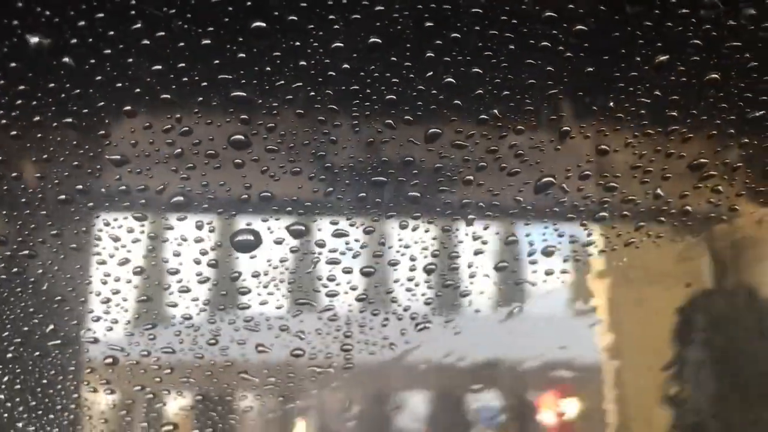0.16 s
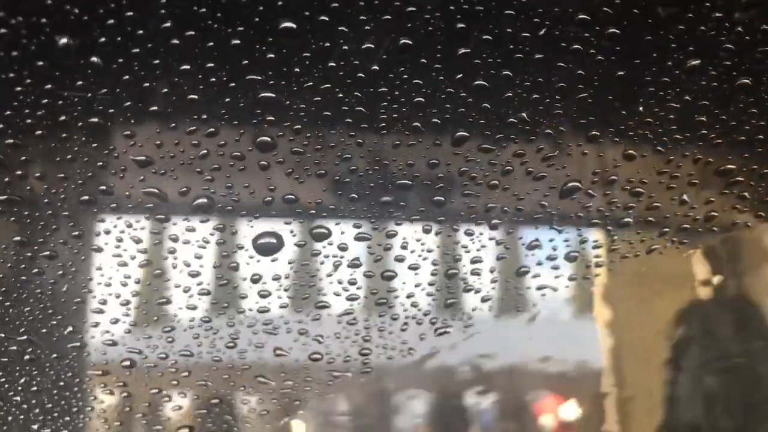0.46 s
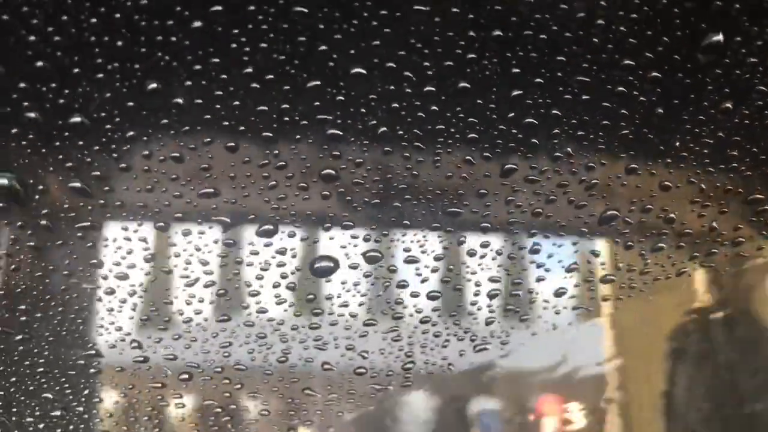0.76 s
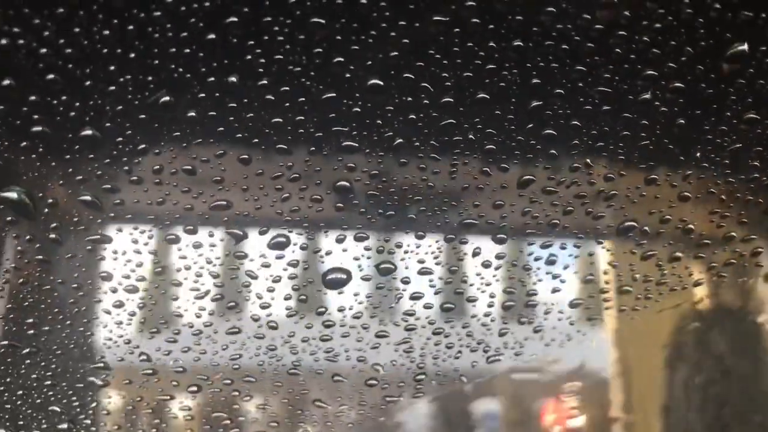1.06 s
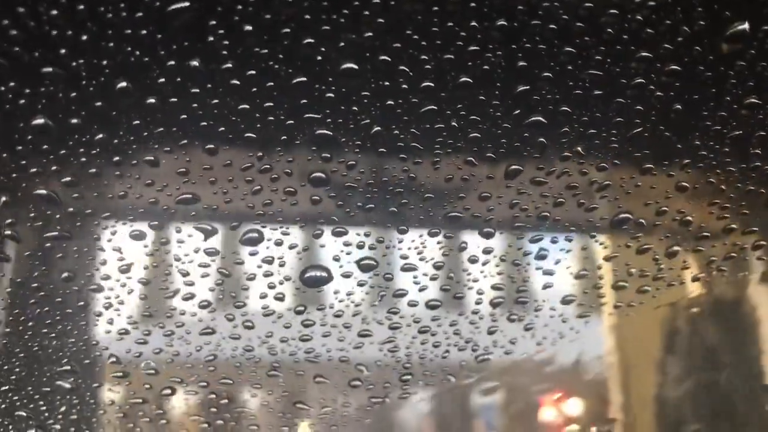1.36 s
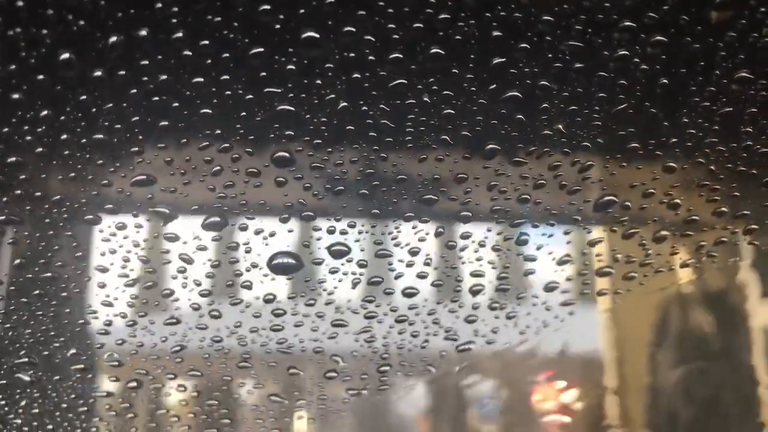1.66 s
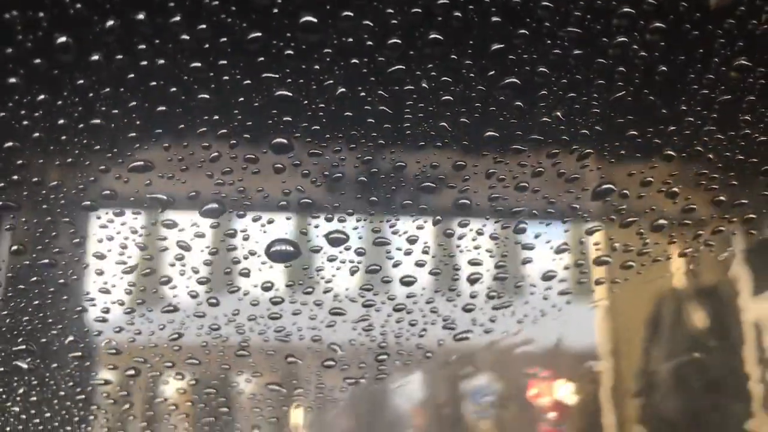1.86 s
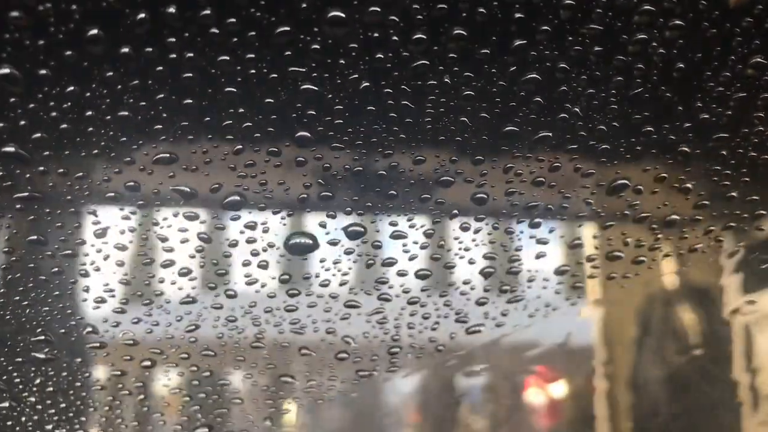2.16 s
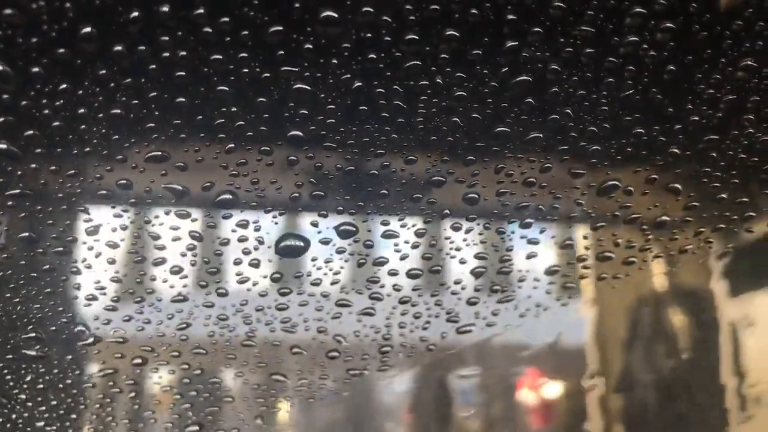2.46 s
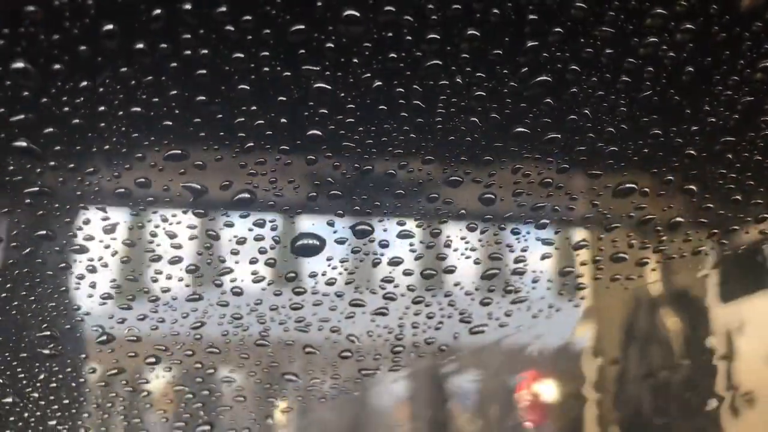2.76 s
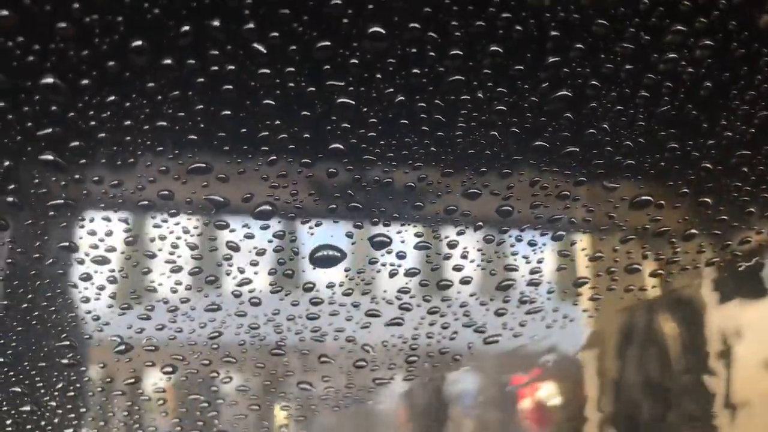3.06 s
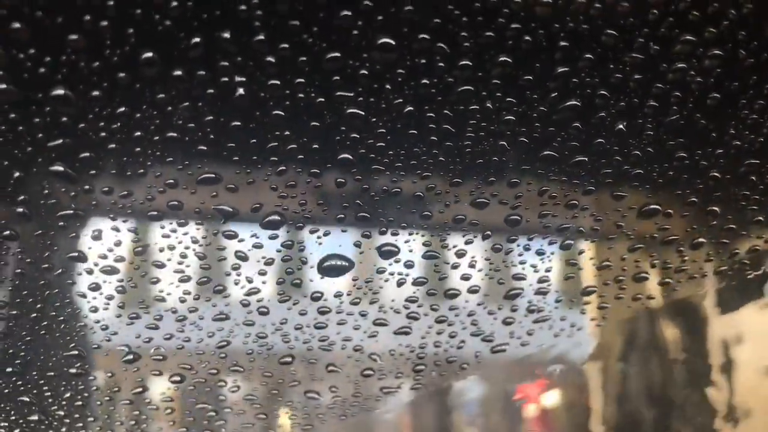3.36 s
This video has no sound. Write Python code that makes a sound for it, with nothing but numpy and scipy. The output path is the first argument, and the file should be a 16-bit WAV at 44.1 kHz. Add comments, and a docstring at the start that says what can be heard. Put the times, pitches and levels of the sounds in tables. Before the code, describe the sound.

Car wash machinery hums steadily, heard from inside a closed car, with one plastic clack.

```python
"""Inside a closed car in a car wash. From the start a motor drones at steady speed through the body
shell, over a dull rumble of machinery and water and an even rush of air with faint duct resonances.
A tiny drop ticks on the glass, then at 1.2 s a nozzle sprays a thin, high hiss. At 1.9 s something
plastic clacks once in the cabin. Another drop follows, and the spray returns just before the end."""
import sys
import numpy as np
from scipy import signal
from scipy.fft import rfft, irfft
from scipy.io import wavfile
from scipy.ndimage import uniform_filter1d

SR = 44100
rng = np.random.default_rng(int(sys.argv[2]) if len(sys.argv) > 2 else 0)


def unload_audio(sound):
    """Save the sound as a 16-bit wav file, at the path given as the first command line argument."""
    columns = np.transpose(np.atleast_2d(sound))
    # keep every value between -1 and 1, then stretch to whole-number steps
    steps = np.round(np.clip(columns, -1, 1) * 32767)
    wavfile.write(sys.argv[1], SR, steps.astype(np.int16))


N = 154350

# The motor's harmonics. Each row: multiple of the turn rate, base level in dB, waver in dB,
# drift in dB per second as the car creeps on.
MOTOR_ORDERS = [(1, -61, 10, 0), (2, -28.5, -0.1, 0), (3, -45, -7, 0), (4, -40, 1, -0.5), (5, -55, 2, 4.5),
                (6, -48, -0.5, -2), (7, -57, 3.5, 2.5), (8, -79, 7.5, 1.5), (9, -52.5, 3, 2.5),
                (11, -63, 2.5, -3), (12, -62, 1.5, -0.5), (13, -73, 6, -4), (14, -69, 3, -1.5),
                (15, -70.5, -2, -2), (16, -72, 8, 1.5), (19, -80.5, 2.5, -10), (20, -89, -8, 10),
                (22, -71, 2, -0.5), (24, -82, 1.5, -2)]
# Fader ride on the drone. Each row: time in seconds, gain in dB.
DRONE_RIDE = [(0, -1.5), (.16, -1.9), (.4, -0.2), (.46, -4), (.6, 0.5), (.98, 0), (1.06, -2), (1.2, 1.2),
              (1.32, -1.5), (1.5, 1.5), (1.72, -2.9), (2.0, 0.7), (2.28, 1.3), (2.42, -0.2), (2.84, 0),
              (3.04, 1), (3.36, -1.5), (3.5, -3.5)]
# The singing tenth harmonic swells and fades. Each row: time in seconds, level in dB.
SINGING_RIDE = [(0, -57), (.22, -57), (.42, -47), (.58, -55.5), (.85, -47), (1.1, -51), (1.55, -48),
                (1.95, -45.5), (2.2, -48.5), (2.6, -52), (3.1, -59.5), (3.5, -52.5)]
TURN_HZ, SPEED_WANDER, SMEAR_RAD_PER_HZ = 39.05, 0.00054, 0.0028

# Rumble behind the closed windows. Each row: frequency in Hz, relative level in dB.
RUMBLE_COLOUR = [(18, -30), (25, -16), (33, -4.5), (42, -10), (57, 1), (75, -5), (88, -4.5), (103, -1.5),
                 (125, -2), (145, -7), (175, -8), (215, -11), (265, -10), (315, -10.5), (370, -17),
                 (430, -19.5), (480, -20), (620, -22), (740, -27.5), (950, -27), (1200, -33), (1500, -38.5),
                 (3000, -62)]
# Rides on the rumble's boomy, boxy and washy bands. Each row: time in seconds, gain in dB.
BOOM_RIDE = [(0, 2.3), (.45, 0.5), (1.3, 0), (2.0, -1), (2.6, -2.5), (3.05, 2), (3.5, 0)]
BOX_RIDE = [(0, -0.7), (1.0, -1), (2.3, -1), (2.8, -1.5), (3.5, -1.7)]
WASH_RIDE = [(0, 1), (.9, 0), (1.6, -.3), (2.4, -2.1), (3.0, -1.7), (3.5, 0.7)]
RUMBLE_DB, RUMBLE_WAVER_DB, THROB_DEPTH, CROSSOVERS_HZ = -35.5, 0.49, 0.08, (175, 340, 680)

# The two contacts of the clack. Each row: start in seconds, level in dB.
CONTACTS = [(1.8925, -46), (1.8991, -47)]
# A contact's bright crack and its dull cabin echo. Each row: frequency in Hz, relative level in dB.
CRACK_COLOUR = [(300, -10), (900, -4), (1400, -4), (1750, -5), (2100, 7), (2600, -4), (3300, 1), (3800, -6),
                (5000, -10), (8200, -9), (10500, -23), (15500, -21)]
ECHO_COLOUR = [(150, -13), (300, 1), (480, -3), (650, 2), (1000, -9), (1500, -13), (3000, -42)]
# Modes of the struck plastic and of the panel behind it.
# Each row: frequency in Hz, relative level in dB, seconds to fall by 60 dB.
PLASTIC_MODES = [(1800, -8, .04), (2000, 0.5, 0.048), (2130, -3, 0.057), (2260, -6.5, 0.036),
                 (3380, 0, 0.014)]
PANEL_MODES = [(305, -10, 0.077), (397, 3, 0.15), (458, 0, 0.15), (804, -13, 0.14), (937, -10, 0.11)]
PLASTIC_DB, PANEL_DB, PANEL_DELAY_S = -2, -38, 0.00348
ECHO_DB, ECHO_DELAY_S = 3, 0.0038

# Tone of the rushing air. Each row: frequency in Hz, relative level in dB.
AIR_COLOUR = [(300, -8.5), (1000, 0), (1550, 1), (2100, -0.5), (2450, -1.5), (2900, -1), (3200, -0.5),
              (4300, -1.5), (4600, -2.5), (4950, -6), (5400, -3.5), (6200, -3), (7000, -7), (7600, -13),
              (8300, -10.5), (9000, -12), (9800, -14.5), (10400, -20.5), (11400, -16), (12800, -16.5),
              (14000, -19.5), (15700, -20)]
# Resonances of the air duct. Each row: centre in Hz, width in Hz, lift in dB.
DUCT_RESONANCES = [(1854, 22, 4), (2136, 64, 6), (2270, 24, 5), (2640, 24, 8.5), (3170, 30, 3),
                   (3300, 27, 4.5), (3586, 15, 8.5), (3950, 67, 4), (6130, 55, -1)]
# Fader ride on the air. Each row: time in seconds, gain in dB.
AIR_RIDE = [(0, 0.6), (.7, 0.5), (1.5, 0), (2.3, -0.2), (2.7, 0.3), (3.2, 0), (3.5, -1)]
AIR_DB, AIR_WAVER_DB, AIR_FLICKER_DB = -55, 0.5, 0.26
RIPPLE_DB, RIPPLE_SPACING_HZ = 1.5, 45.16

# Bursts of spray. Each row: start in seconds, length in seconds, level in dB.
SPRAY_BURSTS = [(1.203, 0.42, -70), (3.35, 0.22, -68.5)]
# Tone of the spray's hiss. Each row: frequency in Hz, relative level in dB.
SPRAY_COLOUR = [(7000, -35), (10400, -12), (11000, -2), (12000, -3), (12800, -3), (13600, -4), (15600, -8)]
# Whistles of the nozzle. Each row: centre in Hz, width in Hz, relative level in dB.
NOZZLE_WHISTLES = [(10950, 110, -4), (11440, 170, -2), (12490, 90, -3), (12900, 140, -4), (13990, 90, -8),
                   (15380, 120, -9)]
SPRAY_ATTACK_S, SPRAY_RELEASE_S, SPUTTER_DB = 0.041, 0.21, 2
WHISTLE_DB, WHISTLE_WAVER_DB = -5, 2.5

# Small drops on the glass. Each row: start in seconds, level in dB.
DROP_HITS = [(.445, -71.5), (2.555, -68)]
# Ring of a drop. Each row: frequency in Hz, relative level in dB, seconds to fall by 60 dB.
DROP_MODES = [(8000, 4, 0.091), (11900, -3, .04), (13100, -3, .04)]

FADE_IN_S, TOP_HZ = .003, 15750


def motor(angle):
    """One push per turn and a stronger one per half turn make a drone of clean, wavering harmonics."""
    def harmonic(order):
        smear = SMEAR_RAD_PER_HZ * order * TURN_HZ * rng.standard_normal()  # the shell scatters phase
        return np.sqrt(2) * np.cos(order * angle + smear)
    since_middle = (np.arange(N) - N / 2) / SR
    drone = sum(harmonic(round(order)) * undb(db + waver * wobble(5.14) + drift * since_middle)
                for order, db, waver, drift in MOTOR_ORDERS)
    singing = harmonic(10) * undb(curve(SINGING_RIDE) + 0.41 * wobble(9.0))
    return drone * undb(curve(DRONE_RIDE)) + singing


def rumble(angle):
    """Machinery and water muffled by the windows, in four bands; the top one throbs with the motor."""
    whole = noise(RUMBLE_COLOUR) * undb(RUMBLE_DB + RUMBLE_WAVER_DB * wobble(5.6))
    below = [signal.sosfiltfilt(signal.butter(4, hz, fs=SR, output="sos"), whole)
             for hz in CROSSOVERS_HZ]
    deep, boom, box, wash = np.diff([np.zeros(N), *below, whole], axis=0)
    throb = 1 + THROB_DEPTH * np.cos(2 * angle)
    return (deep + boom * undb(curve(BOOM_RIDE)) + box * undb(curve(BOX_RIDE))
            + wash * throb * undb(curve(WASH_RIDE)))


def plastic_clack(t):
    """Two quick contacts each crack, ring the plastic and echo in the cabin; the panel thuds once."""
    thud = undb(PANEL_DB) * ring(t - CONTACTS[0][0] - PANEL_DELAY_S, PANEL_MODES)
    hits = np.zeros(N)
    for start, db in CONTACTS:
        age = t - start
        crack = noise(CRACK_COLOUR) * decay(age, t60=0.037)
        body = undb(PLASTIC_DB) * ring(age, PLASTIC_MODES)
        echo = undb(ECHO_DB) * noise(ECHO_COLOUR) * decay(age - ECHO_DELAY_S, t60=0.12)
        hits += undb(db) * (crack + body + echo)
    return thud + hits


def air_rush():
    """Slightly turbulent blown air, coloured by its duct; cabin reflections ripple its spectrum."""
    hz = np.arange(N // 2 + 1) * SR / N
    ripple = np.interp(hz / RIPPLE_SPACING_HZ, np.arange(len(hz)), rng.standard_normal(len(hz)))
    ducted = noise(AIR_COLOUR, DUCT_RESONANCES)
    rush = unit(irfft(rfft(ducted) * undb(RIPPLE_DB * ripple), N))
    turbulence_db = AIR_WAVER_DB * wobble(9.18) + AIR_FLICKER_DB * wobble(50)
    return rush * undb(AIR_DB + curve(AIR_RIDE) + turbulence_db)


def spray(t):
    """Thin, sputtering hiss that swells and dies away; the nozzle's whistles come and go within it."""
    envelope, whistles = np.zeros((2, N))
    for start, length, db in SPRAY_BURSTS:
        attack = (t - start) / SPRAY_ATTACK_S
        release = (start + length - t) / SPRAY_RELEASE_S
        envelope += undb(db) * np.clip(np.minimum(attack, release), 0, 1)
    for hz, width, db in NOZZLE_WHISTLES:
        whistle = signal.lfilter(*signal.iirpeak(hz, hz / width, fs=SR), rng.standard_normal(N))
        whistles += unit(whistle) * undb(db + WHISTLE_WAVER_DB * wobble(25))
    hiss = noise(SPRAY_COLOUR) + undb(WHISTLE_DB) * whistles
    return envelope * hiss * undb(SPUTTER_DB * wobble(120))


def drops(t):
    """Water hits the glass in tiny, bright, ringing ticks."""
    return sum(undb(db) * ring(t - start, DROP_MODES) for start, db in DROP_HITS)


def undb(db):
    """Decibels to gain."""
    return 10 ** (np.asarray(db) / 20)


def unit(x):
    """Scale to rms 1."""
    return x / np.sqrt(np.mean(x ** 2))


def curve(rows):
    """Automation lane: straight lines between points of time in seconds and value."""
    return np.interp(np.arange(N) / SR, *np.array(rows).T)


def wobble(rate_hz):
    """Smooth random modulation: sample-and-hold, slewed twice, with a spread near 1."""
    hold = int(SR / rate_hz)
    steps = np.repeat(rng.standard_normal(N // hold + 1), hold)
    return 1.27 * uniform_filter1d(uniform_filter1d(steps, hold), hold)[:N]


def noise(colour, resonances=()):
    """Noise of rms 1, shaped by an EQ curve and narrow resonances."""
    hz = np.maximum(np.arange(N // 2 + 1) * SR / N, 1)
    point_hz, point_db = np.array(colour).T
    eq_db = np.interp(np.log(hz), np.log(point_hz), point_db)
    for centre, width, lift in resonances:
        eq_db += lift / (1 + (2 * (hz - centre) / width) ** 2)
    return unit(irfft(rfft(rng.standard_normal(N)) * undb(eq_db), N))


def decay(age, t60):
    """Hard attack at age 0, then a tail that falls 60 dB in t60 seconds."""
    return (age >= 0) * np.exp(-np.log(1000) * np.maximum(age, 0) / t60)


def ring(age, modes):
    """Damped modes struck at age 0."""
    return sum(undb(db) * decay(age, t60) * np.sin(2 * np.pi * hz * age) for hz, db, t60 in modes)


def scene():
    """The mono mix, as heard from the front seat."""
    t = np.arange(N) / SR
    turn_hz = TURN_HZ * (1 + SPEED_WANDER * wobble(2.94))
    angle = 2 * np.pi * np.cumsum(turn_hz) / SR
    return (motor(angle) + rumble(angle) + air_rush() + spray(t) + plastic_clack(t) + drops(t))[None]


def record(dry):
    """A click-free fade-in and a steep cut of the highest treble."""
    fade_in = np.minimum(np.arange(N) / SR / FADE_IN_S, 1)
    high_cut = signal.ellip(12, .1, 70, TOP_HZ, fs=SR, output="sos")
    return signal.sosfilt(high_cut, dry * fade_in)


dry = scene()
out = record(dry)
unload_audio(out)
```